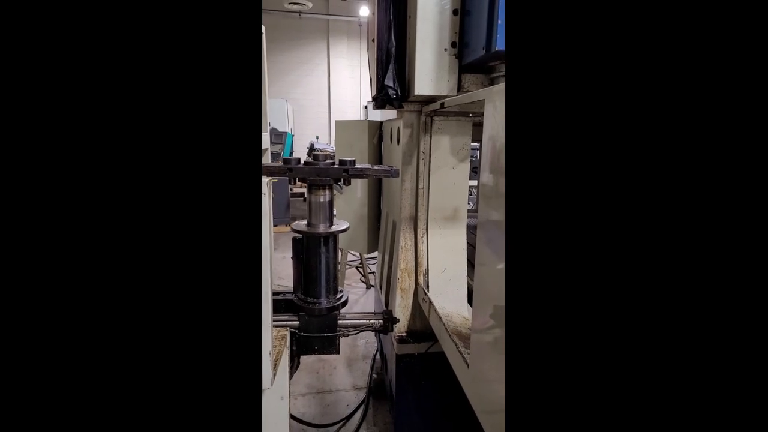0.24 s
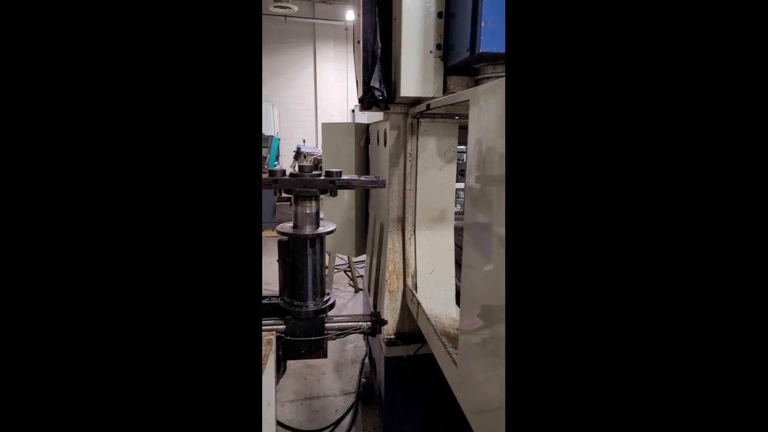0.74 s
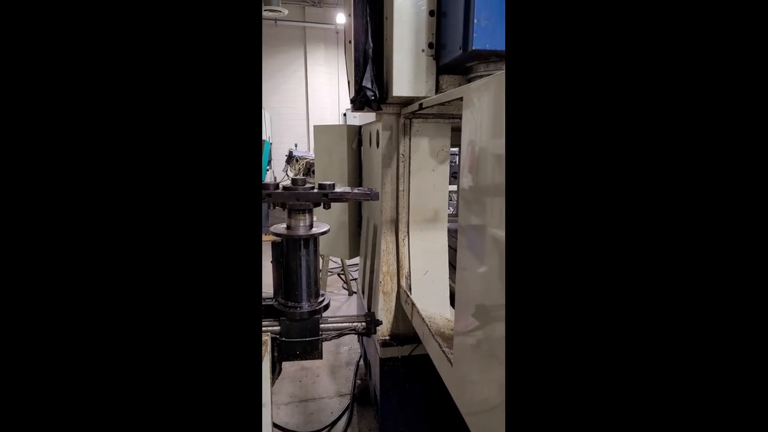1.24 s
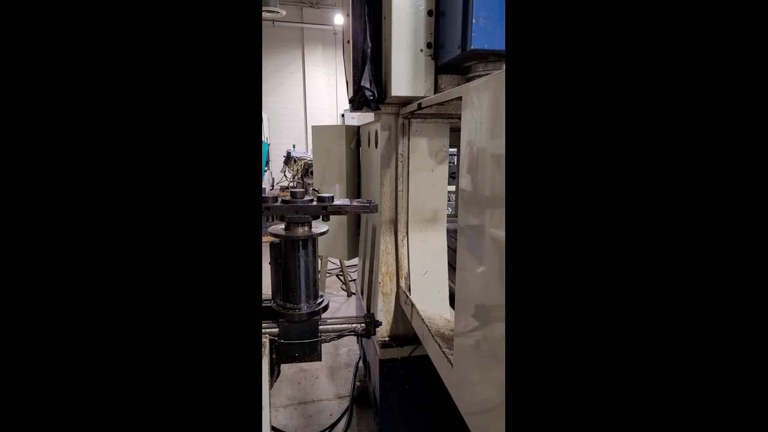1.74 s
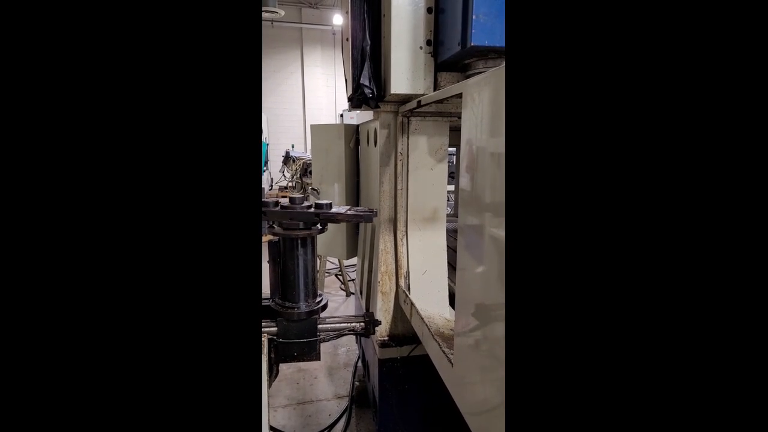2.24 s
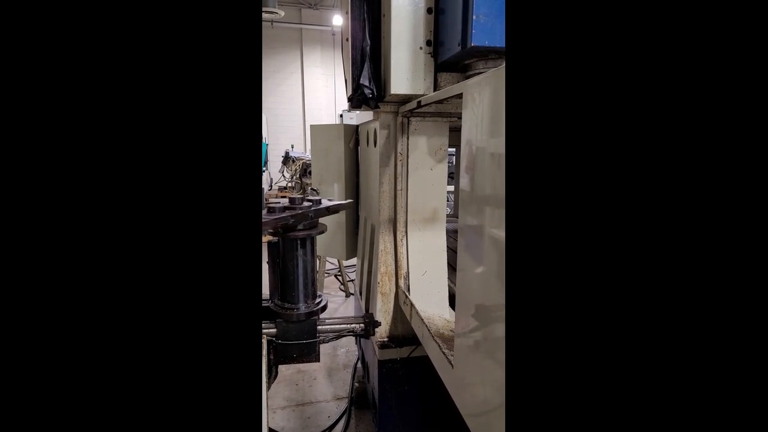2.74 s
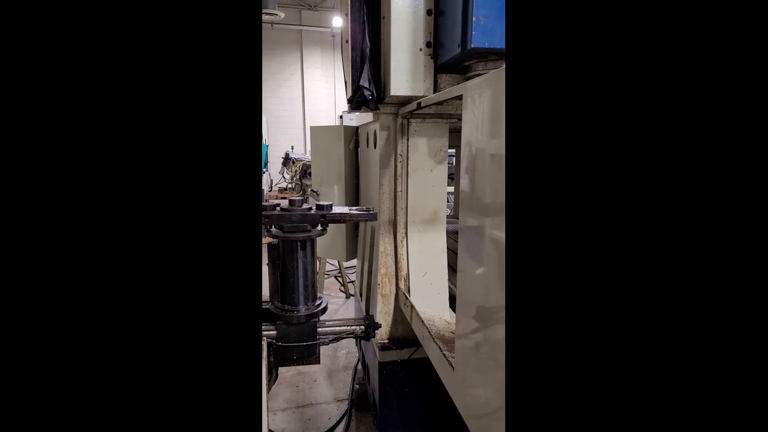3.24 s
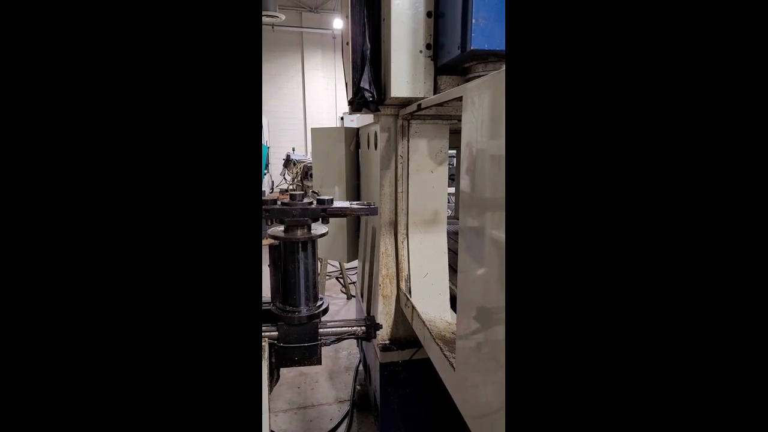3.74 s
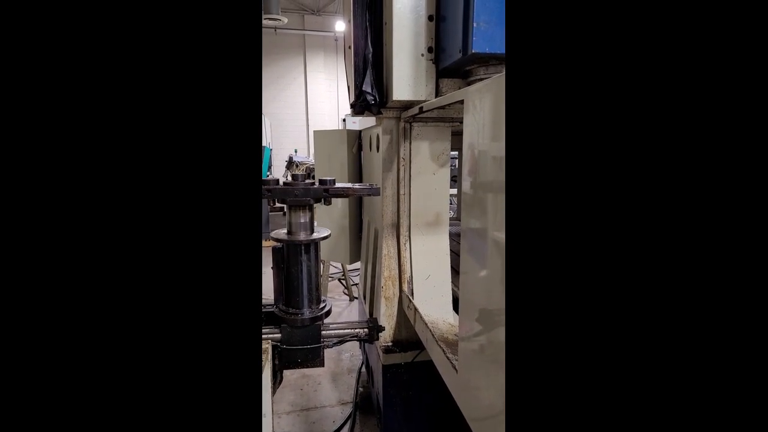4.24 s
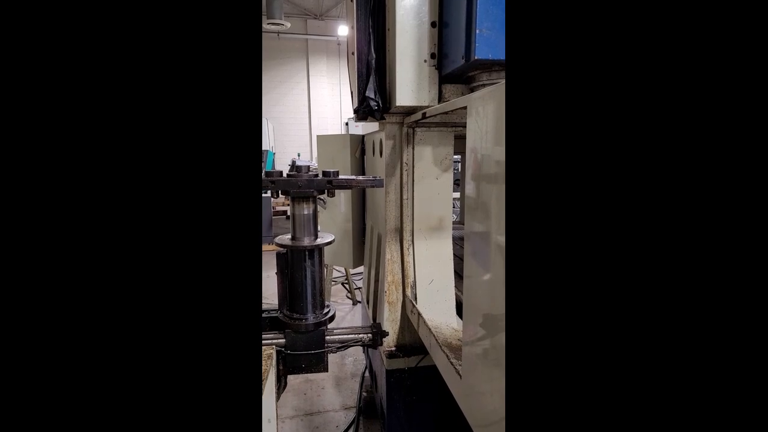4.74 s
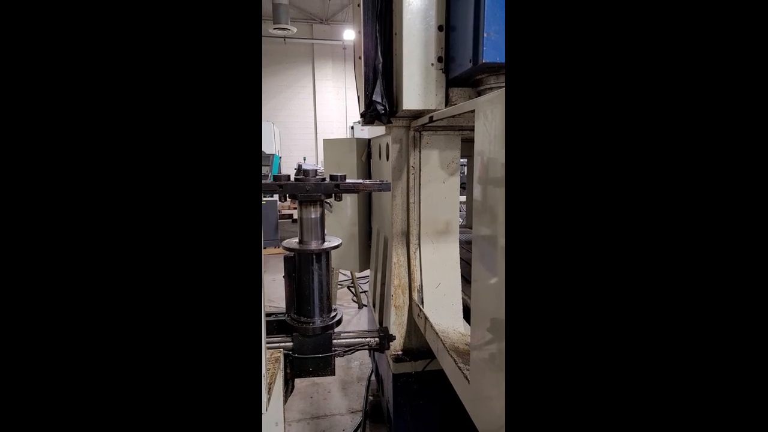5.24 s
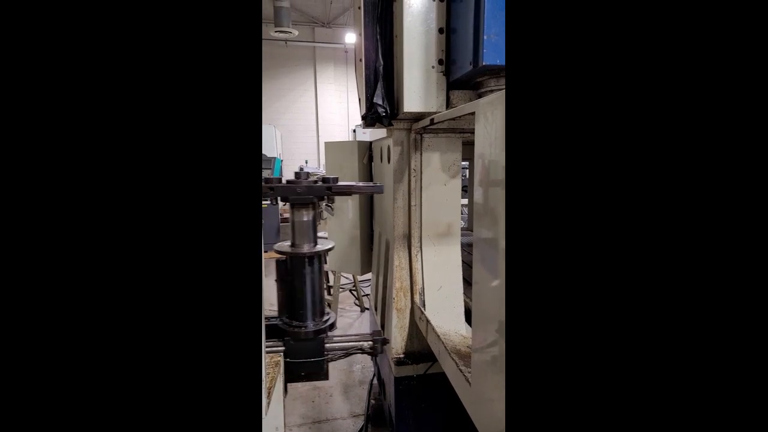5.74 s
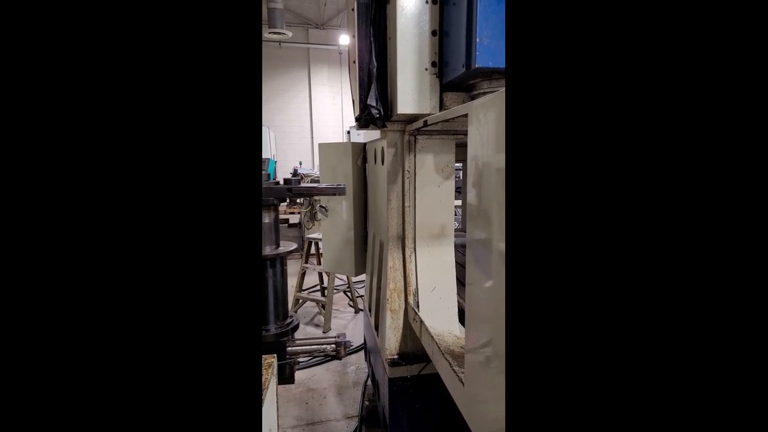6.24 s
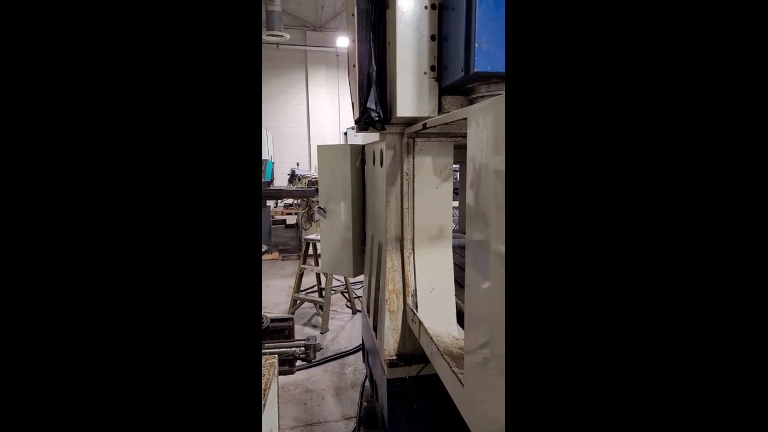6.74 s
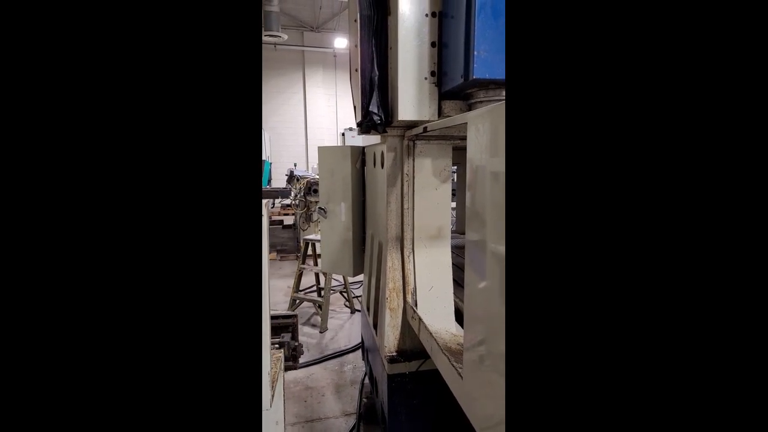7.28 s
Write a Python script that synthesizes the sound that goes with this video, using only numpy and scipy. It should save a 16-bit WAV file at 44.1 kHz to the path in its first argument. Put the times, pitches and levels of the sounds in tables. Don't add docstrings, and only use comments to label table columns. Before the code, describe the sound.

In a reverberant workshop, a fan hums and a hydraulic pump whines over low rumble and faint hiss. A tool changer arm clacks and booms against sheet metal, then compressed air blasts loudly for over a second and a half. A thud cuts it off; after a lull, a sharp puff and clunks begin a second blast. More clacks follow, then a scraping slide. Stereo, from a few steps away.

```python
import sys
import numpy as np
from scipy import signal
from scipy.fft import rfft, irfft, next_fast_len
from scipy.io import wavfile
from scipy.ndimage import map_coordinates

SR = 44100
rng = np.random.default_rng(int(sys.argv[2]) if len(sys.argv) > 2 else 0)


def undo_db(level):
    steps = np.asarray(level, float) / 20
    return 10 ** steps


def output_pcm(signal):
    pcm = np.clip(np.atleast_2d(signal).T, -1, 1) * 32767
    wavfile.write(sys.argv[1], SR, np.round(pcm).astype(np.int16))


N = 331191


def unit(x):
    return x / np.sqrt(np.mean(x ** 2) + 1e-20)


def along(points, hz):
    f, v = np.transpose(points)
    return np.interp(np.log(hz + 1), np.log(f + 1), v)


def curves(rows):
    s, *cols = np.transpose(rows)
    return [np.interp(np.arange(N) / SR, s, c) for c in cols]


def wobble(rate):
    knots = rng.standard_normal(int(N * rate / SR) + 4)
    return map_coordinates(knots, [np.arange(N) * rate / SR])


def spell(start, stop, fade):
    t = np.arange(N) / SR
    return np.clip(np.minimum(t - start, stop - t) / fade + .5, 0, 1)


def burst(lasts, t60, rise, count):
    t = np.arange(count) / SR
    return (1 - np.exp(-t / rise)) * undo_db(-60 * np.maximum(t - lasts, 0) / max(t60, .01))


def add(track, s, x):
    part = track[:, round(s * SR):][:, :x.shape[1]]
    part += x[:, :part.shape[1]]


def filtered(x, response):
    n = x.shape[-1]
    m = next_fast_len(n + 8192)
    return irfft(rfft(x, m) * response(np.fft.rfftfreq(m, 1 / SR)), m)[..., :n]


def peak(f, hz, width):
    return 1j * f * width / (hz * hz - f * f + 1j * f * width)


# frequency in Hz, left-right likeness from -1 to 1.
PORT_LIKENESS = [(60, 0.86), (130, 0.85), (290, 0.9), (640, 0.58), (1410, 0.0095), (3100, 0.12),
                 (6820, -0.11), (15000, 0.18)]


def noise(response, count=N):
    turn = lambda hz: np.arccos(np.clip(along(PORT_LIKENESS, hz), -1, 1)) / 2
    pair = rng.standard_normal((2, count))
    mid, side = filtered(pair, lambda hz: response(hz) * [np.cos(turn(hz)), np.sin(turn(hz))])
    return unit(np.array([mid + side, mid - side]))


def lines(hz, orders, drift, sway_db):
    turn = 2 * np.pi * np.cumsum(hz + drift * wobble(3)) / SR
    total = 0
    for k, db in orders:
        side = np.tanh(rng.normal(0, 0.00089) * k * hz) * np.pi / 4
        level = undo_db(db + sway_db * wobble(6)) * np.sqrt(2)
        total = total + level * np.sin(k * turn + side * np.array([[1], [-1]]))
    return total


# multiple of the fan rate, level in dB.
FAN_LINES = [(1, -1), (2, -13), (3.5, -18.5), (7, -27), (14, -39), (17.5, -31)]


def fan():
    return undo_db(-33) * lines(108.8, FAN_LINES, drift=.8, sway_db=1.0)


# multiple of the pump rate, level in dB.
PUMP_LINES = [(1, -42.5), (2, -62.5), (3, -61.5), (4, -67.5), (5, -54), (6, -57), (9, -65), (10, -64.5)]
# start in seconds, stop in seconds, lift of the fifth multiple in dB,
# lift of the higher multiples in dB.
LOAD_SPELLS = [
    (2.28, 3.08, 5.5, 4),
    (3.3, 3.6, 2, 1.5),
    (5.8, 6.3, 1, 5.5),
    (6.5, 7.3, 2, -1),
]


def pump():
    pump_hz, idle_db = 352.8, -7.5
    whine = undo_db(.3) * lines(pump_hz, PUMP_LINES[:4], drift=0.28, sway_db=1.65)
    strain = np.array([spell(start, stop, fade=.15) for start, stop, *_ in LOAD_SPELLS])
    lifts_db = np.transpose(LOAD_SPELLS)[2:] @ strain
    for lift_db, orders in zip(lifts_db, (PUMP_LINES[4:5], PUMP_LINES[5:])):
        level = undo_db(idle_db + lift_db + 3 * wobble(35))
        whine += level * lines(pump_hz, orders, drift=1.3, sway_db=1.5)
    return whine


# frequency in Hz, level in dB per Hz.
RUMBLE_COLOUR = [(15, -52), (25, -38), (58, -1.5), (82, -7), (108, -2), (162, -4.5), (220, -4.5), (305, -3),
                 (361, -11), (448, -14), (1000, -29.5), (1300, -59), (2200, -120)]


def rumble(gain_db):
    return undo_db(-37 + 0.23 * gain_db + 1.55 * wobble(8)) * noise(lambda f: undo_db(along(RUMBLE_COLOUR, f)))


# frequency in Hz, level in dB per Hz.
FAR_HISS_COLOUR = [(410, -12.5), (700, -3), (1450, -5), (1720, -6), (2140, -6), (2220, -12.5), (2500, -7),
                   (2960, -13.5), (3550, -11), (3940, -14), (7160, -13), (8810, -21), (11400, -13.5),
                   (15600, -15)]


def far_hiss(gain_db):
    level = undo_db(-44 + 0.35 * gain_db + .4 * wobble(2 * np.pi))
    return level * noise(lambda f: undo_db(along(FAR_HISS_COLOUR, f)))


# time in seconds, gain in dB.
GAIN_CONTROL = [(0, 3.5), (.4, 3.5), (.58, -1), (.95, -2), (1.5, -2), (2.1, 0), (2.8, 0.56), (3.3, 0),
                (3.56, 2.5), (3.74, -1.5), (4.3, -1), (4.7, -1.5), (5.3, -1), (5.6, 0), (6.1, 1),
                (6.6, 2.5), (7.15, 4), (7.51, 2.5)]


def shop():
    gain_db, = curves(GAIN_CONTROL)
    return undo_db(gain_db) * (fan() + pump() + rumble(gain_db) + far_hiss(gain_db))


# start in seconds, level in dB, low bore in Hz,
# high bore in Hz, length in seconds.
VALVE_SPITS = [
    (.114, -37.5, 5500, 14000, 0.023),
    (0.342, -25, 5900, 11100, .014),
    (0.471, -31, 9000, 13000, .003),
    (3.573, -36, 9500, 12700, .01),
    (3.577, -20.5, 6300, 10800, .012),
    (5.631, -45, 9000, 10800, .02),
]


def spits():
    out, n = np.zeros((2, N)), SR // 4
    for s, db, low_hz, high_hz, lasts in VALVE_SPITS:
        bores = lambda f: .6 + np.abs(peak(f, low_hz, 1200)) ** 2 + .5 * np.abs(peak(f, high_hz, 1800)) ** 2
        edge = lambda f: f ** 4 / (f ** 4 + 3600 ** 4) / (1 + (f / high_hz / 1.34) ** 12)
        puff = noise(lambda f: bores(f) * edge(f), count=n)
        add(out, s, puff * undo_db(db) * burst(lasts, .095, 0.0016, count=n))
    return out


# frequency in Hz, width in Hz, level in dB.
STEEL_MODES = [(488, 90, 7), (660, 210, 1.5), (927, 110, -0.5), (1200, 200, 2.5), (1730, 350, -4),
               (2230, 67, -0.5), (2910, 110, -4.5), (3620, 140, -9), (5330, 92, -26), (6000, 200, -14),
               (7650, 490, -5)]


def steel(f, between_db):
    return undo_db(between_db) + sum(undo_db(db) * peak(f, hz, width) for hz, width, db in STEEL_MODES)


# start in seconds, level in dB, reach in Hz,
# rattle in seconds, clatter between the resonances in dB.
STEEL_CONTACTS = [(.117, -26, 6600, 0.011, 9), (.158, -30.5, 2640, 0.023, 5), (.2, -35.5, 1100, 0.024, -1),
                  (.339, -29, 2800, 0.035, -10), (.472, -30.5, 1500, .01, -10),
                  (3.575, -26.5, 2780, 0.038, 0), (3.59, -36, 920, .14, -4), (5.1, -35.5, 1090, 0.037, -2),
                  (5.212, -36, 3280, .013, 11), (5.251, -39, 1130, 0.022, -8), (5.506, -40, 2800, .008, -3),
                  (5.615, -25.5, 2420, .01, -11), (5.633, -24.5, 8040, 0.014, -9),
                  (5.67, -34, 4000, .013, 3), (5.71, -47, 3970, .011, -9), (7.18, -32.5, 5300, 0.064, -10),
                  (7.243, -26, 7400, .022, -18), (7.273, -24, 2450, .034, -7),
                  (7.32, -30.5, 7500, .034, -12), (7.419, -35, 2980, .015, -12),
                  (7.46, -45, 7500, .048, -11)]


def clacks():
    out, n = np.zeros((2, N)), SR // 4
    for s, db, reach_hz, lasts, clatter_db in STEEL_CONTACTS:
        edge = lambda f: f ** 2 / (f ** 2 + 400 ** 2) / (1 + (f / reach_hz) ** 8)
        ring = noise(lambda f: steel(f, clatter_db) * edge(f), count=n)
        add(out, s, ring * undo_db(db) * burst(lasts, .11, 0.00045, count=n))
    return out * undo_db(1.0 * wobble(170))


# start in seconds, peak in dB, panel note in Hz, t60 in seconds.
PANEL_BLOWS = [(.117, -21, 520, 0.17), (.152, -11, 475.4, 0.16), (.155, -18.5, 760, 0.11),
               (.166, -10.5, 308, 0.077), (.197, -12, 395, .1), (.345, -18, 262, .16),
               (.391, -25, 198, 0.082), (.471, -18.5, 291, 0.059), (2.124, -19.5, 370.5, 0.15),
               (2.153, -23, 230, 0.14), (2.178, -22, 327, 0.093), (3.579, -17.5, 453, .06),
               (3.586, -13.5, 322, 0.085), (3.635, -14.5, 249, 0.091), (3.659, -16, 338.4, .14),
               (3.74, -24, 320, .08), (4.59, -22, 480, 0.11), (4.604, -11, 325, 0.065),
               (4.638, -18, 331, 0.084), (4.69, -22.5, 300, 0.12), (5.09, -21.5, 300, .2),
               (5.2, -24, 420, 0.12), (5.5, -25.5, 284, .12), (5.618, -19, 200, 0.11),
               (5.65, -16.5, 309.3, 0.13), (7.054, -24, 269, .15), (7.248, -16, 298, .09),
               (7.272, -17, 255, 0.19), (7.323, -16.5, 299, 0.14), (7.425, -16, 270, .16)]


def thuds():
    rebound_s, rebound_db, stray = .03, 8, 0.247
    out, t = np.zeros((2, N)), np.arange(SR // 3) / SR
    chance = rng.standard_normal((len(PANEL_BLOWS), 3, 6))
    for (s, db, hz, t60), draws in zip(PANEL_BLOWS, chance):
        swell = np.sin(np.pi / 2 * np.clip(t / (0.098 * t60), 0, 1)) ** 2
        for k, draw in enumerate(draws):
            panel_hz = hz * np.exp(stray * np.tanh(draw[1]) * min(k, 1))
            note = np.sin(2 * np.pi * panel_hz * t + 0.48 * draw[0] * np.array([[1], [-1]]))
            for near, turn in draw[2:].reshape(2, 2):
                near_hz = panel_hz * np.exp(0.1985 * np.tanh(near))
                note = note + 0.69 * np.sin(2 * np.pi * near_hz * t + turn * np.array([[1.3], [.9]]))
            add(out, s + k * rebound_s, undo_db(db - k * rebound_db) * note * swell * undo_db(-60 * t / t60))
        frame = noise(lambda f: peak(f, 172, 500) / (1 + (f / 650) ** 4), count=len(t))
        add(out, s, undo_db(db - 13.5) * frame * burst(0.026, .2, 0.007, count=len(t)))
    return out


# start in seconds, level in dB, note in Hz, length in seconds.
SINGING_NOTES = [(.118, -31, 2200, .015), (.343, -36, 970, .015), (.344, -40, 1770, .015),
                 (3.935, -36, 2000, .02), (4.155, -35, 2020, .02), (5.616, -28, 1010, 0.012),
                 (6.1, -38, 1150, .018), (5.632, -31, 3500, 0.025), (5.629, -35, 5900, .019),
                 (5.628, -37, 7900, .018), (5.655, -31, 1750, .022), (5.718, -44, 1600, .008),
                 (7.188, -40.5, 5050, .04), (6.6, -40, 680, .018), (7.243, -29.5, 1190, 0.014),
                 (7.27, -31, 1400, .015), (7.275, -33, 1730, 0.086), (7.32, -40, 6170, .072),
                 (7.42, -30.5, 1680, 0.016), (7.452, -37, 1680, .03), (7.443, -47, 7200, .05)]


def notes():
    out, n = np.zeros((2, N)), SR // 4
    for s, db, hz, lasts in SINGING_NOTES:
        width = 0.072 * hz * (hz / 1500) ** .4
        ring = noise(lambda f: peak(f, hz, width) ** 2, count=n)
        add(out, s, ring * undo_db(db) * burst(lasts, 0.085, 0.0016, count=n))
    return out


# opening in seconds, shutting in seconds, steady level in dB,
# surge in dB, time to the surge's peak in seconds.
AIR_BLASTS = [
    (0.476, 2.131, -27, 3.5, .055),
    (3.65, 5.1, -27.5, 3, 0.084),
]
# frequency in Hz, level in dB per Hz.
JET_COLOUR = [(240, -8.5), (400, -12), (459, -10.5), (596, -14), (705, -7), (848, -12.5), (1130, -7),
              (1640, -6), (2060, -4), (3030, -4.5), (7030, 0.5), (8850, -10.5), (11500, -6.5), (15600, -14)]
# frequency in Hz, width in Hz, lift in dB.
BORE_MODES = [(1180, 34, 5), (2070, 93, 1.5), (7720, 560, 2.5), (11400, 600, 1)]


def air():
    opening_s, shutting_s = .004, .032
    fresh = [(7.8, 0.045), (4.9, 0.36)]
    t, out = np.arange(N) / SR, np.zeros((2, N))
    modes = lambda f: sum((undo_db(db) - 1) * peak(f, hz, w) for hz, w, db in BORE_MODES)
    bore = lambda f: undo_db(along(JET_COLOUR, f)) * (1 + modes(f))
    for opens, shuts, db, surge_db, surge_s in AIR_BLASTS:
        age = np.maximum(t - opens, 0)
        shut = np.clip((t - shuts) / shutting_s, 0, 1)
        jet_db = db + surge_db * age / surge_s * np.exp(1 - age / surge_s) - 14 * shut
        sharp_db = 4 + sum(lift_db * np.exp(-age / s) for lift_db, s in fresh)
        full_db = 0.68 + 5.5 * np.exp(-age / .12) + 12 * shut
        valve = np.clip(age / opening_s, 0, 1) * undo_db(-60 * np.maximum(t - shuts - shutting_s, 0) / .1)
        jet = noise(bore)
        low = filtered(jet, lambda f: 1 / (1 + (f / 3500) ** 4))
        top = filtered(jet, lambda f: 1 - 1 / (1 + (f / 9000) ** 8))
        shaped = undo_db(full_db) * low + (jet - low - top) + undo_db(sharp_db) * top
        flutter_db = 0.36 * wobble(14) + 0.31 * wobble(150)
        out += valve * undo_db(jet_db + 3.5 + flutter_db) * shaped
    return out


# time in seconds, scrape level in dB.
SLIDE_SCRAPE = [
    (7.17, -41),
    (7.256, -38),
    (7.282, -28),
    (7.316, -35),
    (7.372, -32),
    (7.42, -34),
    (7.51, -40),
]


def slide():
    leak_s, heave_s = 7.35, 7.43
    scrape_db, = curves(SLIDE_SCRAPE)
    t = np.arange(N) / SR
    moving = np.clip((t - SLIDE_SCRAPE[0][0]) / .012, 0, 1)
    leak_db = -48 + 13 * spell(leak_s, leak_s + 1, fade=.05) - 81 * np.maximum(t - leak_s, 0)
    frame_db = -42.5 + 19.5 * np.exp(-((t - heave_s) / 0.058) ** 2)
    roller = lambda f: undo_db(along([(400, -3), (900, 0.0), (7500, -5.0), (9000, -12)], f))
    scrape = noise(lambda f: steel(f, between_db=-1) * roller(f))
    leak = noise(lambda f: undo_db(along([(8000, -26), (11000, -1), (15500, -5.0)], f)))
    frame = noise(lambda f: peak(f, 85, 100) ** 2)
    scraping = undo_db(scrape_db + 3.0 * wobble(60)) * scrape
    return moving * (scraping + undo_db(leak_db) * leak + undo_db(frame_db) * frame)


# frequency in Hz, t60 in seconds.
ROOM_DECAY = [(100, 0.54), (500, 0.57), (2000, 0.33), (6000, 0.3), (15000, 0.13)]


def room(x):
    hz, t, z = signal.stft(noise(lambda f: 1 + 0 * f, count=SR * 3 // 4), SR, nperseg=256)
    z = z * undo_db(-60 * t / np.clip(along(ROOM_DECAY, hz), .05, 2)[:, None])
    even = z / np.linalg.norm(z, axis=2, keepdims=True)
    tail = signal.istft(even, SR, nperseg=256)[1]
    late = np.pad(x, ((0, 0), (250, 0)))
    return signal.fftconvolve(late, tail / np.linalg.norm(tail[0]), axes=1)[:, :N]


def scene():
    jet = air()
    hits = clacks() + notes() + spits() + thuds() + slide()
    jet = jet + 0.18 * np.roll(jet[::-1], 6, axis=1)
    jet = undo_db(-2.5) * jet
    return shop() + jet + hits + room(jet + undo_db(-4.5) * hits)


def roll_off(x):
    return signal.sosfilt(signal.butter(12, 15930, fs=SR, output="sos"), x)


# frequency in Hz, left minus right in dB.
PORT_COLOUR = [(60, -1), (160, -1), (270, -3), (600, 1), (1200, -2), (2000, -4), (3300, 0.5), (4500, 3),
               (6500, -3), (7200, -2.5), (8400, 6.5), (10200, 2), (11600, 1), (13500, 1)]


def record(dry):
    sides = np.array([[1], [-1]])
    ports = filtered(dry, lambda f: undo_db(along(PORT_COLOUR, f) / 2 * sides) * (f < 15820))
    return roll_off(ports)


dry = scene()
out = record(dry)
output_pcm(out)
```